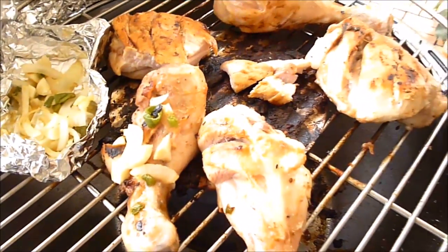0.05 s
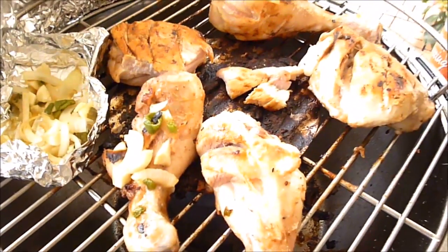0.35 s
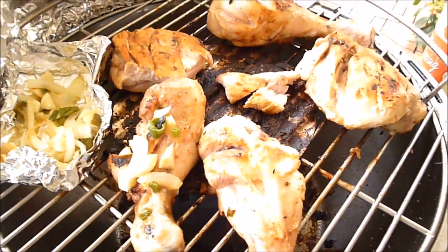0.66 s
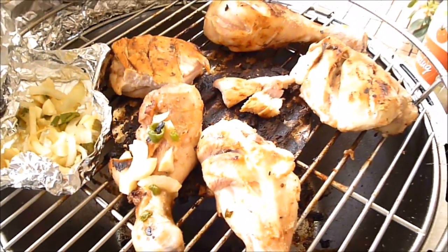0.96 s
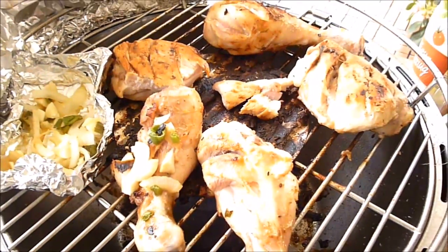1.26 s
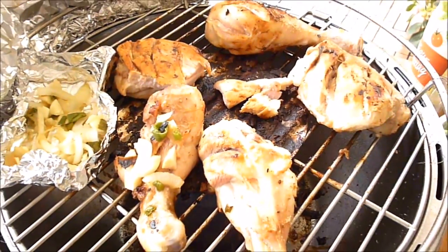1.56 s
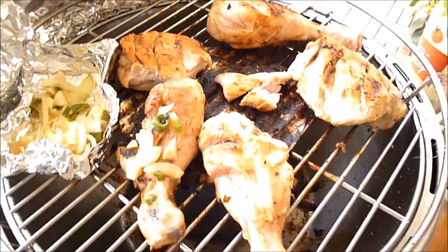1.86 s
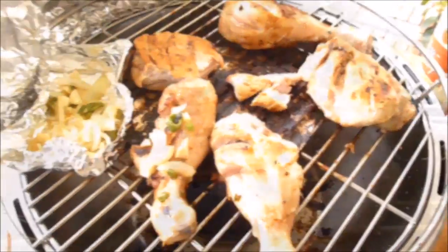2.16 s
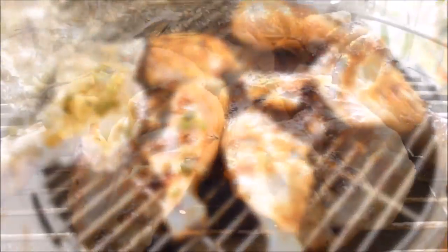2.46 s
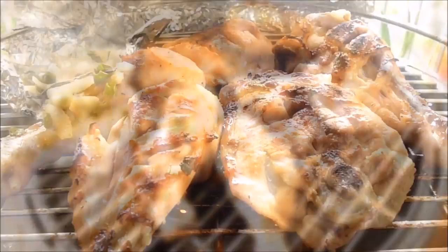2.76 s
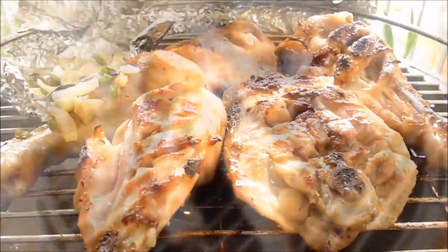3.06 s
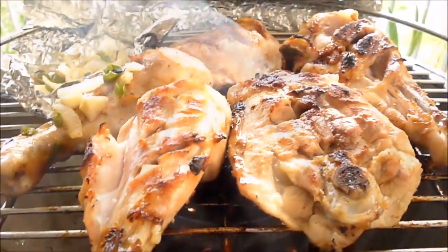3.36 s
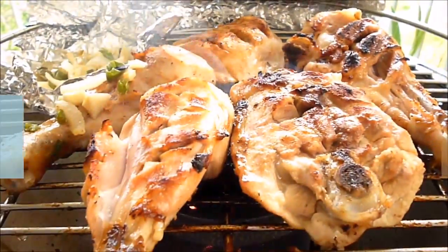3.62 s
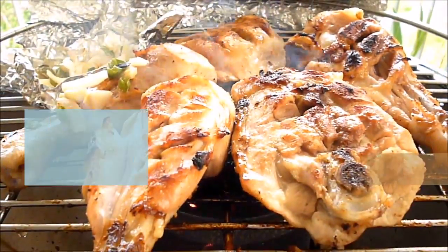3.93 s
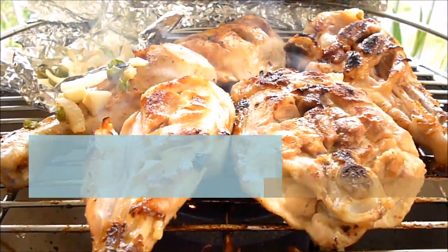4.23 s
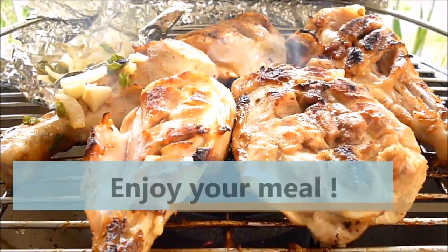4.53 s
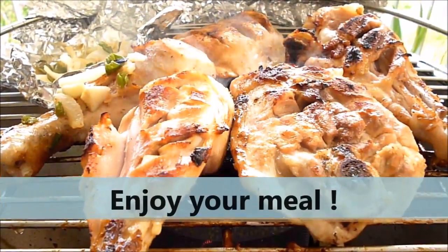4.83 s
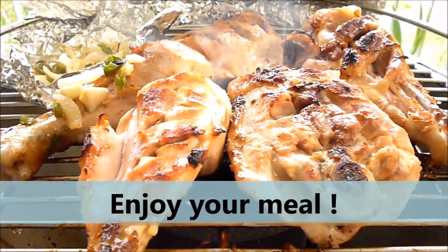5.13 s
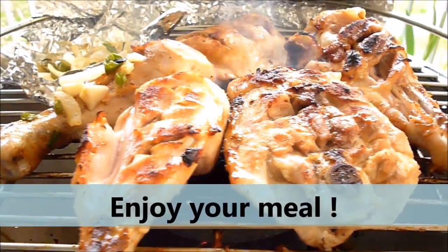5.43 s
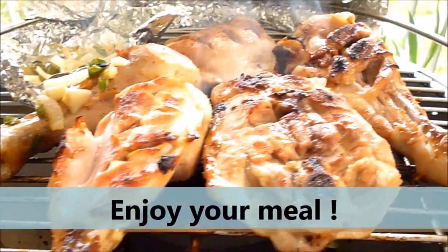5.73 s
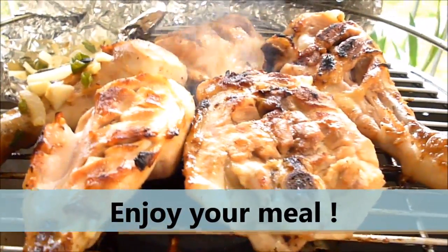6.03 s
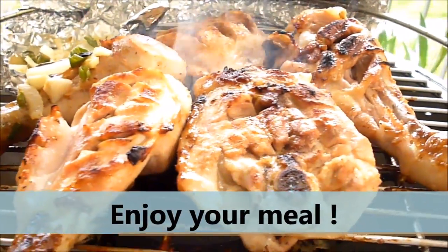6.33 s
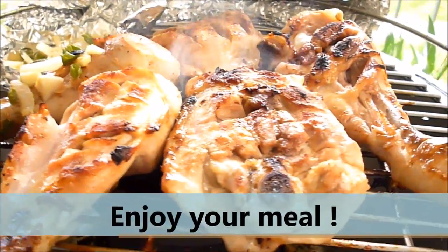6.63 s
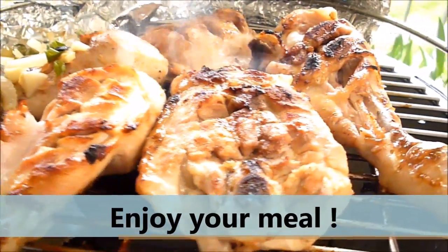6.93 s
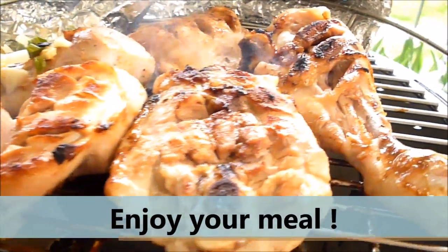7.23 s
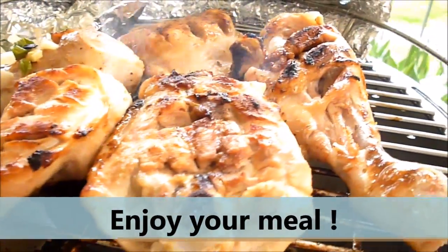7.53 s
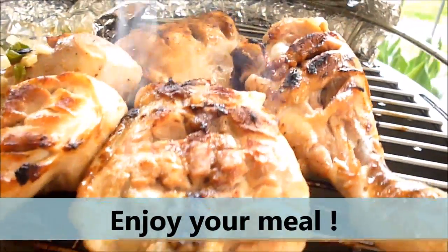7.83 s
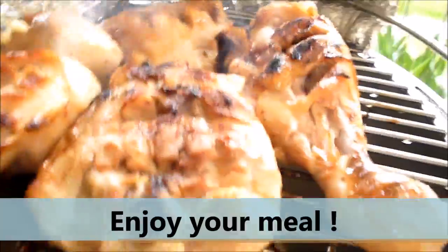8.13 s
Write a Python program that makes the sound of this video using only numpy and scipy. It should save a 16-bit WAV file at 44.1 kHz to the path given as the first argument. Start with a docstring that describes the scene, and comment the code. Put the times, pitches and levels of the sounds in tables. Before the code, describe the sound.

Chicken sizzles and pops on a barbecue, first beside a droning fan, then close up with the fan gone.

```python
"""Chicken sizzles on a barbecue, heard first beside a droning fan, then close over the meat.
Thousands of tiny fat bubbles burst in clumps over a hiss of steam; large ones pop, the hardest
with a soft thud and a brief dip in level. Juice fizzes on hot metal and blubs; fat pings on the grate.
The two places overlap for a while, with a thin click at each cut. The midrange has three narrow
notches, and only the two clicks reach above 8 kHz."""
import sys
import numpy as np
from scipy import signal
from scipy.fft import rfft, irfft
from scipy.io import wavfile

SR = 44100
rng = np.random.default_rng(int(sys.argv[2]) if len(sys.argv) > 2 else 0)


def pcm_store(signal):
    """Save signal as 16-bit PCM."""
    levels = np.round(np.clip(np.atleast_2d(signal), -1, 1) * 32767)
    wavfile.write(sys.argv[1], SR, levels.astype(np.int16).T)


N = 360738
T = np.arange(N) / SR
CLOSE_FROM_S, FAN_UNTIL_S = 2.115, 3.572


def amp(db):
    """Decibels to gain."""
    return 10 ** (np.asarray(db) / 20)


def unit(x):
    """Scales to an rms of one."""
    return x / np.sqrt(np.mean(x ** 2) + 1e-20)


def add(mix, start_s, sound):
    """Mixes a sound in at start_s."""
    part = mix[max(round(start_s * SR), 0):][:len(sound)]
    part += sound[:len(part)]


def colour(x, spectrum):
    """Minimum-phase filter from (f/Hz, gain/dB) rows; clicks keep their sharp start."""
    hz, db = np.transpose(spectrum)
    grid_hz = abs(np.fft.fftfreq(4096, 1 / SR))
    log_gain = np.log(amp(np.interp(np.log(grid_hz + 1), np.log(hz), db)))
    taps = np.fft.ifft(np.exp(np.conj(signal.hilbert(log_gain)))).real
    return signal.oaconvolve(x, taps)[:N]


def drift(rate_hz):
    """Random wander below about rate_hz, unit rms."""
    t = np.arange(0, T[-1] + 1, .001)
    hz = np.fft.rfftfreq(len(t), t[1])
    spectrum = rfft(rng.standard_normal(len(t))) / np.sqrt(1 + (hz / rate_hz) ** 4)
    return unit(np.interp(T, t, irfft(spectrum, len(t))))


def after(start_s):
    """Step from zero to one with a 5 ms ramp."""
    return np.clip((T - start_s) / .005, 0, 1)


def burst(hz, ring_s, echo_db, echo_s):
    """One bubble bursts: a few dying cycles, then scatter from the meat, bars and bowl."""
    t = np.arange(SR // 50) / SR
    snap = np.sin(2 * np.pi * hz * t) * np.exp(-t / ring_s) * (1 - np.exp(-2 * hz * t))
    scatter = rng.standard_normal(len(t)) * np.exp(-t / echo_s) * (1 - np.exp(-t / ring_s))
    echo = np.convolve(snap, scatter / np.linalg.norm(scatter))[:len(t)]
    return snap + amp(echo_db) * echo


def sizzle(spectrum, per_s, spread_db, max_spreads, clump_db, clump_hz, steam_db=-3, spots=10):
    """Mostly small bubbles burst in clumps over steam; each spot has its own pitch, boils up and eases."""
    activity = amp(clump_db * drift(clump_hz))
    onsets = np.flatnonzero(rng.random(N) < per_s * activity / SR)
    size = amp(spread_db * np.minimum(rng.exponential(1, len(onsets)), max_spreads))
    size *= rng.choice([-1, 1], len(onsets))
    spot = rng.integers(0, spots, len(onsets))
    pace, phase = rng.random((2, spots))[:, spot]
    boil_hz = 7 * (.5 + pace)
    boil_db = 3 * np.sin(2 * np.pi * (boil_hz * T[onsets] + phase))
    size *= amp(boil_db)
    bubbles = np.zeros(N)
    for k, hz in enumerate(np.linspace(2000, 8200, spots)):
        impulses = np.bincount(onsets, size * (spot == k), N)
        tick = burst(hz, ring_s=.00014, echo_db=-6, echo_s=.002)
        bubbles += signal.oaconvolve(impulses, tick)[:N]
    # bursting bubbles let the steam out, so it flutters with them
    steam = unit(colour(rng.standard_normal(N) * np.sqrt(activity), spectrum))
    return unit(unit(colour(bubbles, spectrum)) + amp(steam_db) * steam)


# sizzle contour: t/s, level/dB
SIZZLE_LEVEL = [(0.0, -52.5), (0.4, -52.5), (0.52, -54), (0.8, -52), (1.2, -54.5), (1.47, -53), (1.62, -54),
                (2.08, -51.5), (2.15, -48), (2.36, -46.5), (2.7, -49.5), (3.5, -49.5), (3.62, -53.5),
                (3.95, -54.5), (4.35, -55.5), (4.9, -55), (5.6, -53.5), (5.82, -53.5), (6.05, -54.5),
                (6.5, -55), (6.75, -51.5), (7.05, -55), (7.3, -56.5), (7.55, -54), (8.18, -55)]
# sizzle spectra by the fan, close by and over the meat: f/Hz, gain/dB
FAR_SPECTRUM = [(500, -29), (1900, -3.5), (2450, -1), (2650, -5.5), (2950, -4.5), (3280, 0.5), (3550, -3),
                (3900, -1), (4550, -5), (4950, -2), (5900, -1.5), (6400, -3.5), (7000, -11), (7500, -10.5),
                (8000, -22.5)]
NEAR_SPECTRUM = [(300, -17), (1200, -28), (1900, -9), (2400, -3), (2850, -5.5), (3200, -2), (3900, -4.5),
                 (4700, -1.5), (5450, -4.5), (6200, -1), (6800, -7.5), (7150, -3.5), (7600, -9),
                 (8000, -18)]
OVER_SPECTRUM = [(300, -16), (1200, -30), (1900, -7.5), (2400, -1), (2900, -6.5), (3800, -5.5), (5100, 0),
                 (5650, -3), (6700, -0.5), (7200, -7.5), (7600, -12.5), (8000, -24)]
def meat(near_db=1.5, over_db=2.5, overlap_share=.63, move_s=(5.86, 6.63)):
    """Fat sizzles, far and close; the close sound shifts colour as the listener moves over the meat."""
    far = sizzle(FAR_SPECTRUM, per_s=3000, spread_db=3.1, max_spreads=4.5, clump_db=1.5, clump_hz=25)
    close_bubbles = dict(per_s=1900, spread_db=5.2, max_spreads=3.5, clump_db=2.4, clump_hz=30)
    near = amp(near_db) * sizzle(NEAR_SPECTRUM, **close_bubbles)
    over = amp(over_db) * sizzle(OVER_SPECTRUM, **close_bubbles)
    moved = np.interp(T, move_s, (0, 1))
    close = np.sqrt(1 - moved) * near + np.sqrt(moved) * over
    nearness = overlap_share * after(CLOSE_FROM_S) + (1 - overlap_share) * after(FAN_UNTIL_S)
    level = amp(np.interp(T, *np.transpose(SIZZLE_LEVEL)))
    return level * (np.sqrt(abs(1 - nearness)) * far + np.sqrt(nearness) * close)


def rush(density):
    """Air noise from (f/Hz, density/(dB re 1/Hz)) rows."""
    return colour(rng.standard_normal(N), density) * np.sqrt(SR / 2)


def tone(hz, width_hz, rms_db, steady_share):
    """A wavering tone, part steady and part turbulent."""
    flutter = (drift(width_hz / 2) + 1j * drift(width_hz / 2)) / np.sqrt(2)
    cycles = np.cumsum(hz * (1 + .0007 * drift(1.5))) / SR
    envelope = np.sqrt(steady_share) + np.sqrt(1 - steady_share) * flutter
    return amp(rms_db) * unit((envelope * np.exp(2j * np.pi * cycles)).real)


# fan airflow: f/Hz, density/dB
FAN_RUSH = [(20, -89), (55, -83.5), (90, -73.5), (150, -69), (210, -67.5), (310, -72.5), (430, -65.5),
            (530, -71.5), (700, -74.5), (850, -72), (965, -81.5), (1040, -77.5), (1170, -77), (1320, -83),
            (1500, -100), (2600, -115)]
# blade and motor tones: f/Hz, width/Hz, level/dB, steady share
FAN_DRONE = [(472.8, 20, -40.6, .94), (1062.7, 10, -55.6, .985), (1879, 70, -65, 0), (3779, 10, -67.5, .85)]
def fan(start_db=1.33, sag_db_per_s=.47):
    """Rushing air and the tones of blades and motor, growing slowly fainter."""
    level = amp(start_db - sag_db_per_s * T)
    return level * (rush(FAN_RUSH) + sum(tone(*row) for row in FAN_DRONE))


# juice spurts: t/s, length/s, level/dB
JUICE_SPURTS = [(0.015, 0.084, -59.5), (2.113, 0.1, -50), (4.771, 0.045, -48), (5.053, 0.043, -51.5),
                (5.283, .08, -57), (5.72, .06, -52), (6.18, 0.072, -51), (6.283, 0.062, -50),
                (6.566, 0.079, -51.5), (6.722, 0.15, -59), (7.169, 0.048, -48.5), (7.407, 0.13, -56),
                (7.928, 0.37, -55)]
# fizz spectrum: f/Hz, gain/dB
FIZZ_SPECTRUM = [(500, -39.5), (2400, -8), (4000, -6), (5200, -2), (6600, -2), (7300, -4), (8000, -17)]
def spurts(rise_s=.0052):
    """Juice runs onto hot metal, fizzes up fast and boils away."""
    envelope = np.zeros(N)
    for start_s, length_s, db in JUICE_SPURTS:
        t = np.arange(0, length_s, 1 / SR)
        add(envelope, start_s, amp(db) * np.minimum(t / rise_s, 1) * (1 - (t / length_s) ** 4))
    fizz = sizzle(FIZZ_SPECTRUM, per_s=1200, spread_db=5, max_spreads=3,
                  clump_db=2.5, clump_hz=80, steam_db=-8, spots=6)
    return envelope * fizz


# large fat bubbles: t/s, level/dB, f/Hz, dip/dB (negative lifts)
FAT_POPS = [(0.0252, -25.5, 5100, -1), (0.668, -32.5, 4700, 0), (1.041, -29, 5900, -0.5),
            (1.1853, -30, 5270, -1.5), (1.2916, -29, 4900, 0.5), (1.441, -24, 5360, 0),
            (1.4457, -27, 3100, -1), (1.4986, -25, 5500, 0.5), (1.802, -31, 5900, 0),
            (2.077, -30, 5800, -0.5), (2.158, -30, 5800, 2.5), (2.1629, -27, 5600, 0),
            (2.182, -30, 5600, 0.5), (2.2886, -25, 4500, -0.5), (2.3916, -23, 4900, -0.5),
            (2.398, -25, 5930, 1.5), (2.559, -24.5, 4600, 0.5), (2.841, -26.5, 5500, 1),
            (2.9678, -29, 5800, -1), (2.998, -25, 5500, 1.5), (3.0452, -25, 5100, -1.5),
            (3.119, -29, 4960, 0.5), (3.1766, -26.5, 5700, 0), (3.4564, -30, 4960, 0),
            (3.8915, -30, 5200, -0.5), (3.8977, -26, 4200, 0), (3.9022, -33, 5800, -1),
            (3.9076, -12, 5000, 6.5), (3.9327, -30.5, 4800, 0), (4.03, -27.5, 4000, 0),
            (4.204, -30, 5600, 1), (4.4255, -28.5, 6240, 0.5), (4.49, -28, 5800, -1),
            (4.4974, -27.5, 6270, 1), (4.5677, -26.5, 5040, 0.5), (4.7739, -27, 6000, 0.5),
            (4.7783, -22, 6500, -1), (4.8128, -31, 5800, 1), (4.874, -25, 5500, 0),
            (4.9203, -35, 5000, -0.5), (4.9395, -30, 4800, 1.5), (5.0175, -30, 5800, 0),
            (5.063, -32, 5800, -0.5), (5.147, -31.5, 6200, 0), (5.1578, -22, 6100, 0.5),
            (5.22, -35, 6000, 0), (5.2518, -27, 4700, 0.5), (5.3185, -27, 6000, 1),
            (5.3983, -31, 6100, 0.5), (5.6027, -30, 5500, 0.5), (5.731, -26.5, 6100, 1),
            (5.758, -23.5, 6160, 1.5), (5.9131, -25, 4100, -1.5), (5.9614, -23, 6250, 1.5),
            (6.112, -28, 4800, -1), (6.1673, -23.5, 6000, 2), (6.1856, -34, 5650, 1),
            (6.2127, -25, 5100, -1.5), (6.2284, -26, 6400, -1), (6.237, -28, 6200, -0.5),
            (6.298, -22.5, 6600, 2), (6.4066, -26.5, 5000, -1), (6.4345, -29, 6500, 0.5),
            (6.5787, -28, 6000, -0.5), (6.6034, -33, 6000, 1), (6.7036, -20.5, 5150, 1),
            (6.8335, -31, 6200, 0), (6.8577, -18.5, 6150, 2), (6.912, -25, 6400, -1),
            (6.9262, -23, 6160, 1.5), (6.9456, -18.5, 6240, 4.5), (7.1378, -32, 4000, -0.5),
            (7.212, -28, 6400, 1), (7.2554, -26.5, 6300, 0.5), (7.2674, -27, 6200, 0),
            (7.336, -30, 6500, 0), (7.35, -31, 6400, -0.5), (7.402, -30, 6200, 0.5),
            (7.4119, -23.5, 6200, -0.5), (7.4501, -32, 6500, 0), (7.4696, -26, 6400, -0.5),
            (7.5663, -27, 5600, -1.5), (7.6464, -24.5, 6300, 1.7), (7.662, -26, 5000, -0.5),
            (7.703, -29, 4300, -1.5), (7.708, -27.5, 6100, 0.5), (7.7778, -29, 5150, -1),
            (7.85, -25, 5200, 0.5), (7.856, -22, 4500, 0.5), (7.9482, -28, 5200, 0.5),
            (7.967, -34, 5300, -1), (8.0172, -29, 6340, -1.5), (8.073, -25.5, 6500, -1),
            (8.0774, -23.5, 5400, 2.5)]
# pop spectrum: f/Hz, gain/dB
POP_SPECTRUM = [(100, -12.5), (500, -8), (1200, -3), (2200, 2.5), (3200, -2.5), (5000, -3), (6500, 5),
                (7400, 0.5), (8000, -8.5)]
def pops(rows, gain_db=7.5, ring_db=-22, ring_cycles=5, thud_db=-54):
    """Large bubbles: a snap with spatter and the ring of the open cavity; the hardest are followed by a soft
    thud that scales with the dip."""
    snaps, thuds = np.zeros((2, N))
    t = np.arange(SR // 5) / SR
    thud = np.exp(-t / .028) * (1 - np.exp(-t / .0003))  # a step that leaks away
    for start_s, db, hz, dip_db in rows:
        # a larger cavity rings lower and longer
        snap = burst(hz, ring_s=.62 / hz, echo_db=-9, echo_s=.0021)
        ring = burst(hz, ring_s=ring_cycles / hz, echo_db=-20, echo_s=.003)
        add(snaps, start_s, amp(db + gain_db) * (snap + amp(ring_db) * ring))
        add(thuds, start_s, -amp(thud_db) * max(dip_db, 0) * thud)
    return colour(snaps, POP_SPECTRUM) + thuds


def dips(recover_s=.28):
    """Gain that drops at some pops, lifts a little at others, and creeps back."""
    gain_db = np.zeros(N)
    for start_s, _, _, dip_db in FAT_POPS:
        gain_db -= dip_db * after(start_s) * np.exp(-abs(T - start_s) / recover_s)
    return amp(gain_db)


# drops on the grate: t/s, level/dB, f/Hz
GRATE_PINGS = [(1.447, -46, 3200), (1.4983, -33.5, 3220)]
def pings():
    """Drops of fat hit the metal bars, which ring briefly."""
    out = np.zeros(N)
    for start_s, db, hz in GRATE_PINGS:
        add(out, start_s, amp(db) * burst(hz, ring_s=.0026, echo_db=-24, echo_s=.003))
    return out


# air around the grill: f/Hz, density/dB
AIR_RUSH = [(15, -100.5), (60, -91.5), (110, -90), (145, -82.5), (172, -87.5), (200, -81), (230, -86.5),
            (255, -87.5), (285, -83.5), (310, -86), (355, -89), (430, -81.5), (520, -88.5), (620, -92),
            (800, -91.5), (1000, -91.5), (1300, -100), (2000, -106), (8000, -125)]
# swell of the rush: t/s, level/dB
AIR_SWELL = [(3.6, 0.5), (4.05, -1.5), (4.5, -1), (5.15, 0.5), (5.55, 2.5), (6.0, 0), (6.35, -1.5),
             (6.6, 1), (6.95, -1), (7.35, -1), (7.7, 0), (8.18, 0)]
# hum tones: f/Hz, width/Hz, level/dB, steady share
AIR_HUM = [(299, 8, -74.5, .6), (595, 8, -72.5, .8), (668.5, 8, -72.8, .7)]
def open_air():
    """A faint low rush that slowly swells and sinks, with a thin hum."""
    swell = amp(np.interp(T, *np.transpose(AIR_SWELL)))
    return swell * rush(AIR_RUSH) + sum(tone(*row) for row in AIR_HUM)


def spits(per_s=30, count=260):
    """Smaller pops of fat at random moments, heard only from close by."""
    wait, size, pitch = rng.random((count, 3)).T
    times_s = CLOSE_FROM_S + np.cumsum(-np.log(1 - wait)) / per_s
    levels_db = -37.5 + 3 * (2 * size - 1)
    pitches_hz = 5300 + 1900 * (2 * pitch - 1)
    return pops([(s, db, hz, 0) for s, db, hz in zip(times_s, levels_db, pitches_hz) if s < T[-1]])


# bubbles in thick juice: t/s, level/dB, f/Hz
JUICE_BLUBS = [(4.028, -33.5, 506), (4.933, -39, 514), (5.825, -31.5, 564), (7.213, -46, 450)]
def blubs(per_s=14, count=100, low_hz=450, high_hz=1200):
    """Thick juice blubs low and soft over a fainter random simmer, heard once the fan is gone."""
    wait, pitch, size = rng.random((count, 3)).T
    times_s = FAN_UNTIL_S + np.cumsum(-np.log(1 - wait)) / per_s
    levels_db = -50 + 10.5 * (2 * size - 1)
    pitches_hz = low_hz + pitch * (high_hz - low_hz)
    out = np.zeros(N)
    for start_s, db, hz in [*JUICE_BLUBS, *zip(times_s, levels_db, pitches_hz)]:
        add(out, start_s, amp(db) * burst(hz, ring_s=.0012, echo_db=-23.5, echo_s=.003))
    return out


def scene(dc_offset=.0046):
    """Sizzle and pops throughout; the fan drone gives way to quiet air. Mono."""
    dip_gain = dips()
    fan_side = (fan() + dc_offset) * (1 - after(FAN_UNTIL_S))
    close_side = (dip_gain * open_air() + dc_offset) * after(CLOSE_FROM_S)
    fat_and_juice = pops(FAT_POPS) + spurts() + pings() + blubs()
    sizzling = dip_gain * (meat() + spits())
    return (fan_side + close_side + fat_and_juice + sizzling)[None]


# midrange notches: f/Hz, width/Hz
MID_NOTCHES = [(1400, 240), (1600, 383), (2150, 210)]
# clicks at the cuts: t/s, level/dB
CLICKS = [(2.1154, -41), (3.5696, -50)]
def record(dry, notch_floor_db=-28.5, lowpass_hz=7850, click_top_hz=15800):
    """Notches, then a low-pass; the clicks are added last, so they reach higher."""
    for hz, width_hz in MID_NOTCHES:
        notched = signal.lfilter(*signal.iirnotch(hz, hz / width_hz, SR), dry)
        dry = notched + amp(notch_floor_db) * (dry - notched)
    lowpass = signal.firwin(201, lowpass_hz, window=("kaiser", 7), fs=SR)
    out = signal.oaconvolve(dry, lowpass[None], "same")
    click = signal.firwin(61, click_top_hz, window=("kaiser", 7), fs=SR)
    for centre_s, db in CLICKS:
        add(out[0], centre_s - len(click) / 2 / SR, amp(db) * click)
    return out


dry = scene()
out = record(dry)
pcm_store(out)
```